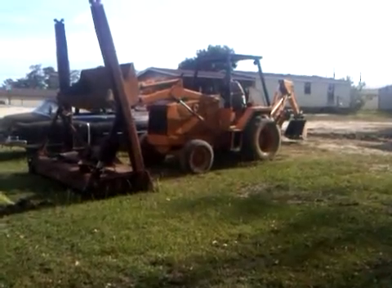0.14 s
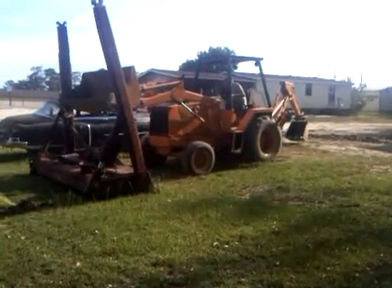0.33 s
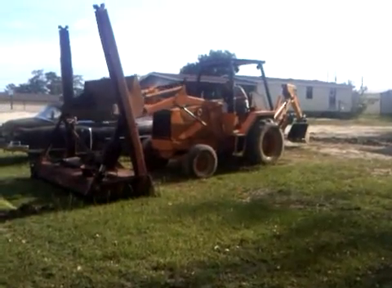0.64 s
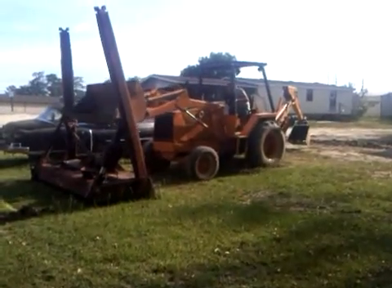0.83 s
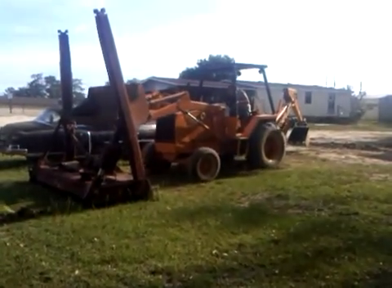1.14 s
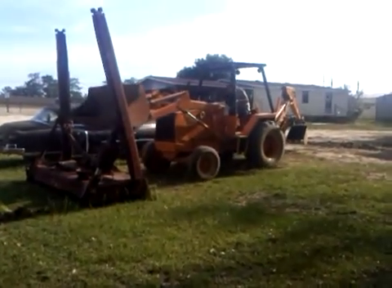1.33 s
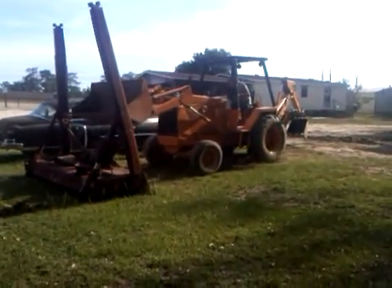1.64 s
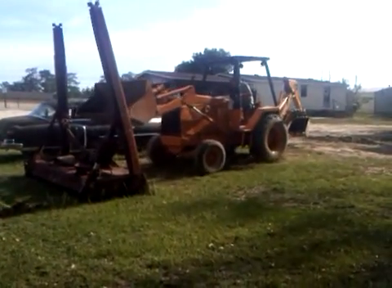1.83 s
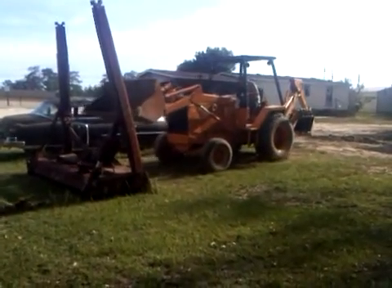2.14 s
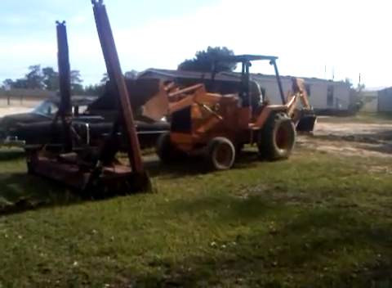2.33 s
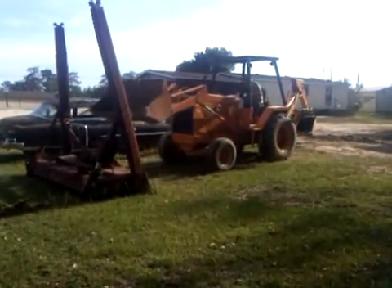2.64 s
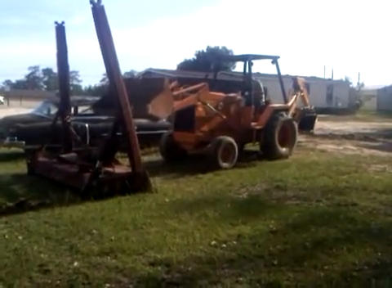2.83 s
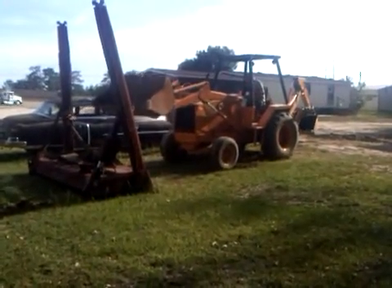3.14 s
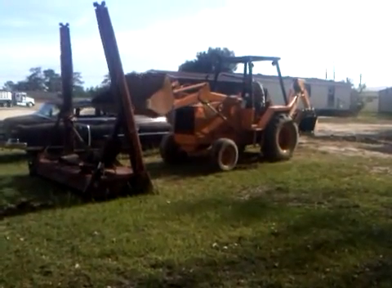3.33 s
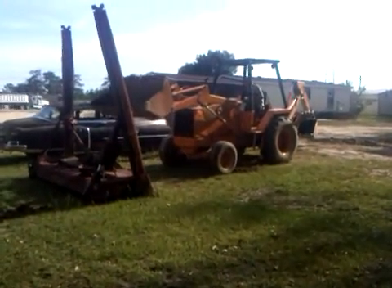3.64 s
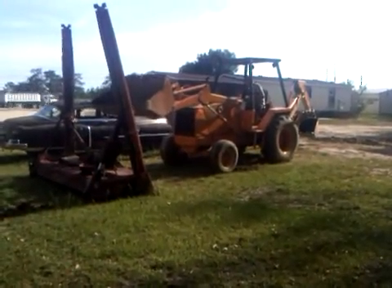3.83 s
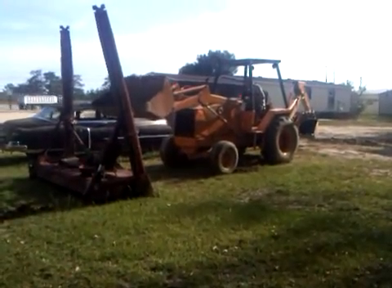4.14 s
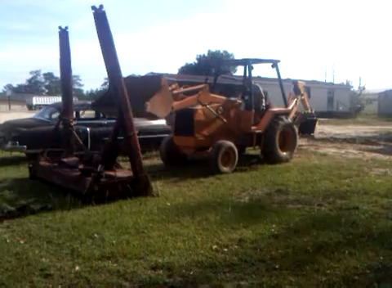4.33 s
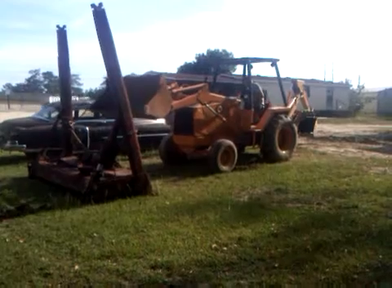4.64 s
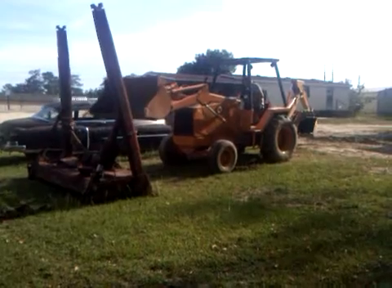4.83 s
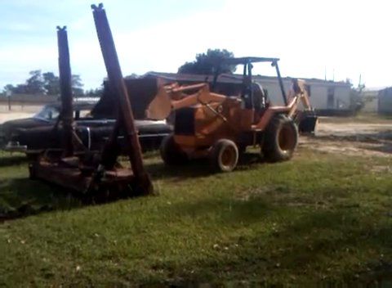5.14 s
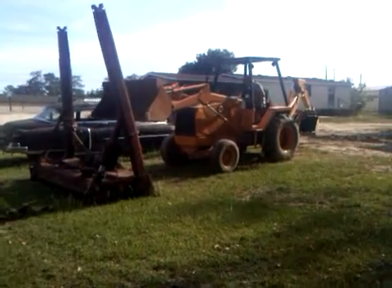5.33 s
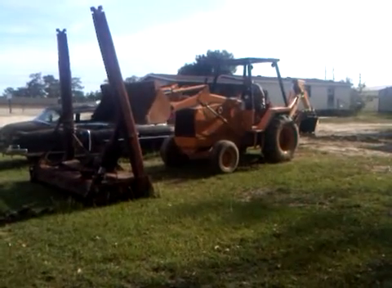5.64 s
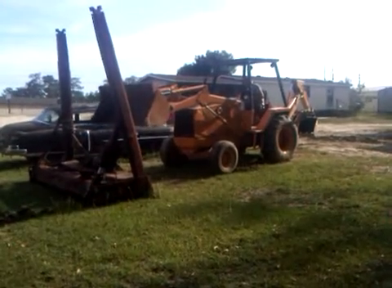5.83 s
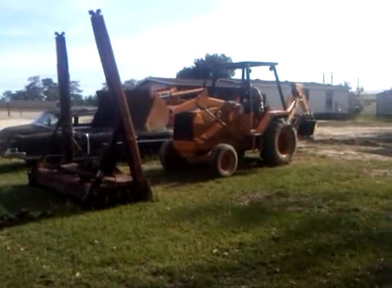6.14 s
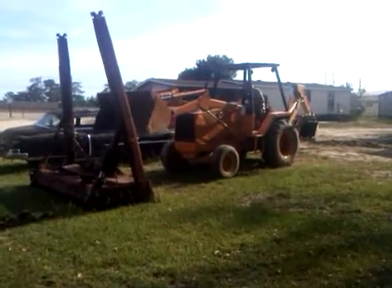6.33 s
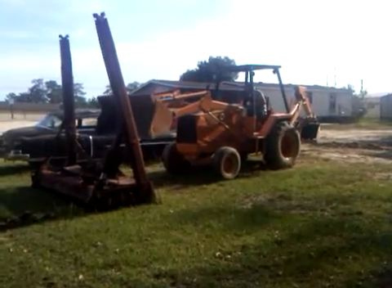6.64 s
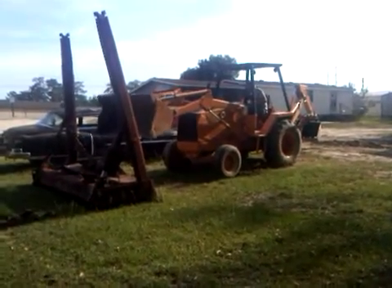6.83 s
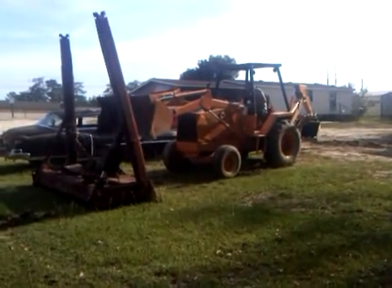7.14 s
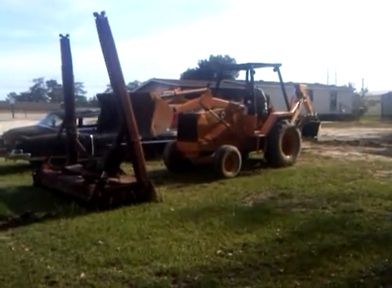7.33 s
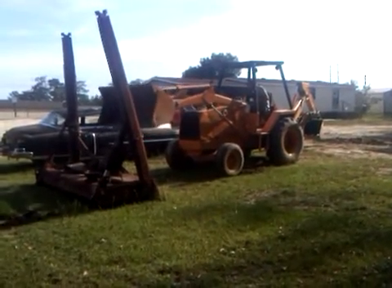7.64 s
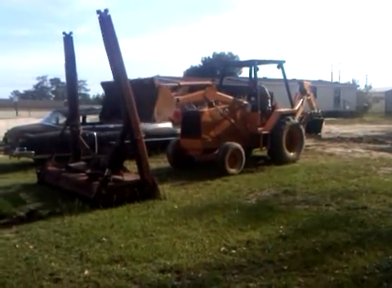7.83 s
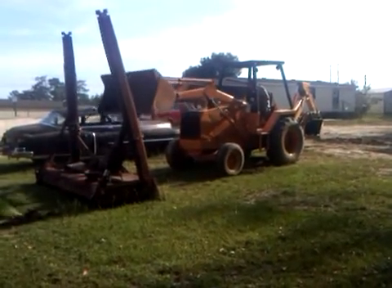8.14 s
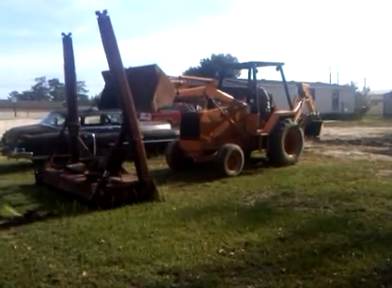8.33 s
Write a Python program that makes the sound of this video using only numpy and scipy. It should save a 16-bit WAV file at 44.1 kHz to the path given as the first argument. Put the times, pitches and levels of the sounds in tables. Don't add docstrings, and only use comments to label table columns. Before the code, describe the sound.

Outdoor diesel engine roars and clatters, drops abruptly to a surging, lumpy idle, with panel rattle, hydraulic groans, dry squeaks and late metal clanks.

```python
import sys
import numpy as np
from scipy import signal
from scipy.fft import rfft, irfft, next_fast_len
from scipy.io import wavfile
from scipy.ndimage import uniform_filter1d

SR = 44100
rng = np.random.default_rng(int(sys.argv[2]) if len(sys.argv) > 2 else 0)


def generate_wav(signal):
    frames = np.transpose(np.atleast_2d(signal))
    scaled = np.clip(frames, -1, 1) * 32767
    pcm = np.round(scaled).astype(np.int16)
    wavfile.write(sys.argv[1], SR, pcm)


def invert_db(x):
    u = np.asarray(x, float) / 20
    return 10 ** u


N = 373527
T = np.arange(N) / SR

# time in seconds, speed in firings per second.
REV = [
    (0.42, 30.4),
    (0.682, 36.6),
    (0.798, 39.6),
    (1.002, 42.1),
    (1.098, 43.0),
    (1.292, 42.6),
    (1.4, 41.4),
    (1.648, 39.6),
    (2.08, 39.7),
]
# time in seconds, shift in dB.
BOOM = [(0, 0.5), (2, -0.5), (3, -6), (4, -7.5), (5, 1.5), (6, 4.5), (7, 5.5), (8, 3), (8.47, 1.5)]
# frequency in Hz, density in dB per Hz.
CLATTER_REV = [(560, -29.5), (950, -8), (1140, -5.5), (1240, -3), (1430, -7.5), (1670, -0.5), (2160, -4.5),
               (2330, -2), (3060, -12), (3900, -18), (5070, -52.5), (8580, -120)]


def evened(x):
    return x / np.sqrt(np.mean(x ** 2) + 1e-20)


def curve(rows, index=1):
    rows = np.array(rows)
    return np.interp(T, rows[:, 0], rows[:, index])


def resonate(x, hz, width_hz):
    return signal.lfilter(*signal.iirpeak(hz, hz / width_hz, SR), x)


def resonate_twice(x, hz, width_hz, second_width_hz):
    return resonate(resonate(x, hz, width_hz), hz, second_width_hz)


def noise(colour_db, patchy_db, size=512):
    frames = 4 * N // size + 5
    a, b, patches = rng.standard_normal((frames, size // 2 + 1, 3)).T
    patches = uniform_filter1d(uniform_filter1d(patches, size=3, axis=0), size=8, axis=1)
    z = (a + 1j * b) * invert_db(patchy_db * evened(patches))
    x = signal.istft(z, nperseg=size, noverlap=3 * size // 4)[1][:N]
    length = next_fast_len(N)
    f, db = np.transpose(colour_db)
    log_hz = np.log(np.fft.rfftfreq(length, 1 / SR) + 1)
    colour = invert_db(np.interp(log_hz, np.log(f + 1), db, left=-120, right=-120))
    return evened(irfft(rfft(x, length) * colour, length)[:N])


def blow_shape(length_s, rise_s, fall_s):
    t = np.arange(int(length_s * SR)) / SR
    return t, (1 - np.exp(-t / rise_s)) * np.exp(-t / fall_s)


def bursts(rows, rise_s, fall_s):
    shape = blow_shape(.15, rise_s, fall_s)[1]
    kicks = np.zeros(N)
    for s, db, *_ in rows:
        kicks[int(s * SR)] = invert_db(db)
    return signal.oaconvolve(kicks, shape / shape.max())[:N]


def rings(rows, width_hz, rise_s, fall_s, strike=0):
    creep_s = .004 * bool(strike)
    out = np.zeros(N)
    t, shape = blow_shape(.12, rise_s, fall_s)
    for s, db, hz, *_ in rows:
        shake = rng.standard_normal(len(t)) * shape
        touch = strike * np.exp(-t / .003) * np.sin(2 * np.pi * hz * t)
        ring = resonate_twice(shake + touch, hz, width_hz, 2 * width_hz)
        part = out[int((s - creep_s) * SR):][:len(t)]
        part += (invert_db(db) * ring / abs(ring).max())[:len(part)]
    return out


def throttle():
    return np.interp(T, [REV[0][0], .7, 2.05, REV[-1][0] + .02], [0, 1, 1, 0])


def swells(times_s, peak_db, rise_s, fall_s, sag_db, square, rest_db):
    t = np.arange(0, N / SR + .01, .004)
    since = t[:, None] - times_s
    away = abs(since) / np.maximum(np.where(since < 0, rise_s, fall_s), .02)
    power = (invert_db(peak_db - sag_db * away ** square) ** 2).sum(1) + invert_db(rest_db) ** 2
    return np.interp(T, t, np.sqrt(power))


def follow(usual_db, thump, hiss, sag_db, square, lead_s, rest_db, roar_db, lingers_s=0):
    # time in seconds, thump in dB, hiss in dB, rise in seconds, fall in seconds.
    surges = [(0.006, -39, -45.8, 0.124, 0.2), (2.24, -52, -53, 0.16, 0.13),
              (2.517, -41, -44.5, 0.1, 0.097), (2.817, -40.5, -49.5, 0.083, 0.1),
              (3.172, -41, -49.5, 0.11, 0.082), (3.527, -39.8, -47.7, 0.14, 0.089),
              (3.823, -40, -46, 0.11, 0.083), (4.124, -46.5, -51.4, 0.23, 0.14),
              (4.423, -40, -51.5, 0.11, 0.15), (4.808, -43.5, -54, 0.15, 0.074),
              (5.066, -39.8, -49, 0.122, 0.055), (5.358, -43.5, -48, 0.073, 0.12),
              (5.532, -50, -44.7, 0.077, 0.038), (5.699, -43, -50.5, 0.163, 0.13),
              (5.953, -41.0, -53.5, 0.1, 0.127), (6.288, -39.5, -51, 0.11, 0.179),
              (6.598, -36.3, -50.4, 0.064, 0.069), (6.761, -39.5, -54, 0.064, 0.26),
              (7.087, -40.5, -51, 0.104, 0.149), (7.352, -43, -55, 0.16, 0.12),
              (7.637, -43.5, -49.5, 0.25, 0.083), (7.907, -38.9, -51.5, 0.096, 0.12),
              (8.165, -38.0, -49.5, 0.12, 0.17), (8.408, -42, -52, 0.12, 0.161)]
    # time in seconds, level in dB.
    effort = [(0.21, -54), (0.25, -43), (0.58, -43), (0.74, -37.4), (1.1, -35.8), (1.46, -38.8),
              (2.01, -38.5), (2.075, -46.5), (2.4, -54.5)]
    usual_thump_db, usual_hiss_db = -41, -50
    s, thump_db, hiss_db, rise_s, fall_s = np.transpose(surges)
    peak_db = usual_db + thump * (thump_db - usual_thump_db) + hiss * (hiss_db - usual_hiss_db)
    effort_db = np.interp(T - lingers_s * throttle(), *np.transpose(effort), left=-99, right=-99)
    surging = swells(s - lead_s, peak_db, rise_s, fall_s, sag_db, square, rest_db)
    return np.hypot(surging, invert_db(effort_db + roar_db))


def idle_exhaust(idle_speed):
    cylinders_db = [-4, -9.5, -3.5, -8]
    # frequency in Hz, width in Hz, level in dB.
    pipe_modes = [(55.1, 11.1, 4), (43.7, 12, -3), (85.3, 35.5, -1), (101.8, 20, -7), (117.2, 7.2, 1)]
    swell = (-42, 0.977, 0, 6.5, 1.35, -0.03, -51.5, 1.3)
    turns = np.cumsum(idle_speed) / SR
    at = np.flatnonzero(np.diff(np.floor(turns)))
    luck = rng.standard_normal((400, 2))[:len(at)]
    late = (.003 * SR * luck[:, 0]).astype(int)
    kicks = np.zeros(N)
    kicks[np.clip(at + late, 0, N - 1)] = invert_db(np.resize(cylinders_db, len(at)) + 3.5 * luck[:, 1])
    drive = evened(kicks) + 0.84 * rng.standard_normal(N)
    modes = [invert_db(db) * resonate_twice(drive, hz, width, 2.26 * width) for hz, width, db in pipe_modes]
    pipe = invert_db(curve(BOOM)) * modes[0] + invert_db(-curve(BOOM)) * modes[1] + sum(modes[2:])
    steady = np.sqrt(uniform_filter1d(pipe ** 2, size=6000))
    quiet_db = -15 * throttle()
    return invert_db(quiet_db) * np.minimum(follow(*swell), invert_db(-34)) * pipe / steady


def casting_knock(turns):
    # frequency in Hz, width in Hz, level in dB.
    casting = [(715, 50, -23), (810, 70, -16), (1595, 50, -16), (1715, 70, -17), (2045, 55, -15),
               (2137, 40, -18), (2290, 60, -14), (2394, 50, -16), (4150, 70, -24)]
    end = int(REV[-1][0] * SR) + 4000
    turns = turns[:end]
    luck = rng.standard_normal((400, len(casting)))[turns.astype(int)]
    burst = np.exp(-((turns + .1) % 1) / .3) * rng.standard_normal(end)
    out = np.zeros(N)
    for k, (hz, width, db) in enumerate(casting):
        struck = invert_db(4.0 * luck[:, k]) * burst
        out[:end] += invert_db(db) * evened(resonate_twice(struck, hz, width, 3 * width))
    return throttle() * out


def hood_hum():
    # frequency in Hz, width in Hz, level in dB.
    hood = [(700, 50, -13), (830, 80, -13)]
    # time in seconds, level in dB.
    strain = [(0, -6), (4, -4), (5.8, 1), (7.3, 2), (7.6, -8), (8.47, -8)]
    out = np.zeros(N)
    for hz, width, db in hood:
        hum = evened(resonate_twice(rng.standard_normal(N), hz, width, 3 * width))
        out += invert_db(db + curve(strain)) * hum
    return out


def block(turns):
    # frequency in Hz, density in dB per Hz.
    drone_idle = [(97, -37), (165, -2), (249, 3.5), (284, -8), (344, -8.5), (431, -10), (523, -7.5),
                  (601, -11), (686, -1), (1050, -7), (1360, -35), (2310, -120)]
    drone_rev = [(140, -33), (230, -3), (341, -11), (445, -9), (515, -5.5), (632, -10.5), (713, 0),
                 (1050, -4.5), (1360, -32), (2310, -120)]
    clatter_idle = [(560, -16.5), (950, -3.5), (1230, 4), (1390, -4.5), (1550, 0), (1970, -0.5), (2190, -3),
                    (3270, -6), (3900, -12.5), (5070, -50), (8580, -120)]
    hiss_colour = [(2380, -35.5), (4050, -2), (4250, -0.5), (5930, -6.5), (6750, -11.5), (7310, -21.5),
                   (7500, -62), (7600, -68.5), (9880, -90), (16700, -120)]
    drone_swell = (-45.7, 0.58, 0.22, 6.8, 1.55, 0.04, -52.5, -1.4)
    clatter_swell = (-46.5, 0.25, 0.53, 6, 1.07, 0.06, -57.5, 2)
    hiss_swell = (-51, 0.02, 1.02, 11.3, 2.5, 0.02, -65.2, -6.5)
    rev_share = throttle()
    idle, rev = np.sqrt(1 - rev_share), np.sqrt(rev_share)
    strength = invert_db((4.0 - 2.2 * rev_share) * rng.standard_normal(400)[turns.astype(int)])
    throb = evened(1 + 0.38 * strength * np.sin(np.pi * turns) ** 2)

    drone = idle * noise(drone_idle, 2.1, size=2048) + rev * noise(drone_rev, 2.15, size=2048)
    drone += idle * hood_hum()
    drone *= invert_db(.02 * curve(BOOM))

    clatter = idle * noise(clatter_idle, 3.1) + rev * invert_db(-1.5) * noise(CLATTER_REV, 2.75, size=1024)
    clatter += casting_knock(turns)
    db_per_speed, db_per_gain = .25, .11
    speed = curve(REV)
    gaining = uniform_filter1d(np.maximum(np.gradient(speed) * SR, 0), size=6000)
    clatter *= invert_db(rev_share * (db_per_speed * (speed - REV[-1][1]) + db_per_gain * gaining))

    hiss = follow(*hiss_swell) * noise(hiss_colour, 2.4)
    drone *= follow(*drone_swell, lingers_s=.045)
    return throb * (drone + follow(*clatter_swell) * clatter + hiss)


def slams():
    # start in seconds, peak in dB.
    strokes = [(0.0218, -42), (0.0644, -47), (0.254, -37), (0.29, -33.5), (0.325, -31.5), (0.359, -34.5),
               (0.459, -33.5), (0.5544, -33.5), (0.696, -27.5), (2.5094, -38), (3.354, -35.5), (3.522, -36),
               (3.724, -39), (4.297, -38), (5.325, -35.5), (5.67, -38), (8.14, -34), (8.172, -33),
               (8.3983, -34)]
    # frequency in Hz, density in dB per Hz.
    scrape_colour = [(290, -47), (500, -13), (1360, -5.5), (1500, -6.5), (1620, -1), (3470, -7),
                     (3780, -2.5), (5000, -22), (6500, -45), (11000, -120)]
    return invert_db(-5.0) * bursts(strokes, .004, .014) * noise(scrape_colour, 3.6)


def pings():
    # start in seconds, peak in dB, frequency in Hz.
    blows = [(0.0223, -39, 2370), (0.0588, -38, 1960), (0.3077, -36, 2290), (0.3586, -34, 2470),
             (0.4304, -37, 2060), (0.4993, -36, 2290), (0.6095, -34, 2220), (0.6973, -27, 2300),
             (0.7711, -29, 2290), (0.8225, -27, 2280), (0.8729, -27, 2050), (0.9722, -27, 2290),
             (1.1069, -31, 2400), (1.1807, -28, 2300), (1.255, -29, 2000), (1.3428, -32, 2000),
             (1.4666, -34, 1970), (1.5414, -30, 2310), (1.5693, -34, 2110), (1.6432, -29, 2000),
             (1.7389, -32, 2290), (1.8442, -30, 2260), (1.8961, -33, 2140), (1.9754, -32, 2030),
             (2.1041, -41, 1990), (2.3416, -44, 2120), (2.4404, -39, 2320), (2.7442, -40, 2230),
             (3.3563, -34, 2280), (3.5309, -36, 2240), (3.7274, -44, 2560), (4.3999, -38, 2520),
             (5.3293, -38, 1960), (5.4919, -37, 2310), (5.6376, -41, 1900), (5.8536, -42, 2220),
             (5.9374, -43, 2150), (6.2158, -42, 2200), (6.5655, -38, 2330), (7.0878, -40, 2320),
             (7.8211, -39, 2210), (8.1359, -37, 2010), (8.1728, -34, 1900), (8.4023, -36, 2240)]
    return invert_db(-4.0) * rings(blows, 190, .002, .013, strike=.3)


def loose_panel():
    # start in seconds, peak in dB, frequency in Hz.
    rev_blows = [(0.0283, -33, 1660), (0.0682, -29, 1550), (0.2563, -36, 1500), (0.2972, -35, 1450),
                 (0.3311, -28, 1510), (0.3591, -33, 1720), (0.5247, -38, 1560), (0.5556, -32, 1730),
                 (0.6145, -38, 1780), (0.856, -33, 1800), (0.8874, -29, 1640), (0.9996, -28, 1730),
                 (1.0605, -30, 1710), (1.1807, -32, 1730), (1.2336, -30, 1610), (1.2575, -32, 1630),
                 (1.3249, -31, 1640), (1.3803, -32, 1560), (1.4057, -30, 1780), (1.5883, -33, 1710),
                 (1.6492, -30, 1670), (1.7205, -31, 1700), (1.7514, -32, 1580), (1.8008, -34, 1530),
                 (1.8477, -29, 1600), (1.925, -32, 1710)]
    idle_blows = [(2.1871, -51, 1620), (2.4874, -44, 1580), (2.7424, -39, 1600), (3.0517, -51, 1490),
                  (3.105, -42, 1570), (3.1884, -45, 1540), (3.4767, -39, 1500), (3.5291, -38, 1530),
                  (3.577, -36, 1570), (3.7251, -43, 1550), (3.7795, -39, 1550), (3.8139, -41, 1540),
                  (3.8568, -40, 1570), (4.0424, -42, 1600), (4.0863, -39, 1550), (4.1322, -33, 1530),
                  (4.3552, -46, 1590), (4.3986, -48, 1540), (4.4485, -39, 1590), (4.4899, -42, 1550),
                  (4.7129, -41, 1590), (4.7518, -41, 1570), (4.9454, -42, 1600), (4.9918, -40, 1540),
                  (5.0396, -44, 1560), (5.2706, -48, 1610), (5.3185, -34, 1580), (5.4956, -39, 1600),
                  (5.5395, -41, 1550), (5.6368, -37, 1560), (5.8618, -38, 1600), (5.8922, -39, 1550),
                  (5.986, -39, 1590), (6.0344, -45, 1600), (6.2125, -36, 1570), (6.2604, -41, 1600),
                  (6.5278, -46, 1550), (6.5622, -38, 1610), (6.7468, -40, 1530), (6.8321, -41, 1530),
                  (6.87, -37, 1600), (7.0052, -48, 1590), (7.0451, -47, 1590), (7.0865, -38, 1530),
                  (7.542, -44, 1610), (7.6283, -41, 1590), (7.6772, -36, 1540), (7.8183, -31, 1560),
                  (7.8577, -36, 1590), (7.9036, -37, 1590), (7.9421, -36, 1580), (8.0718, -39, 1680),
                  (8.1067, -38, 1520), (8.1451, -31, 1590), (8.1825, -30, 1610), (8.2933, -40, 1570),
                  (8.3297, -33, 1600), (8.3751, -38, 1610)]
    rev = invert_db(-4.5) * rings(rev_blows, 125, .002, .016, strike=.3)
    idle = invert_db(0.7) * rings(idle_blows, 125, .0015, .02, strike=.3)
    scrape = invert_db(-10.5) * bursts(idle_blows, 0.004, 0.013) * noise(CLATTER_REV, 3.4)
    return rev + idle + scrape


def pops():
    # start in seconds, peak in dB, frequency in Hz.
    firings = [(0.246, -30, 70), (2.495, -30, 59.2), (2.962, -29, 116), (3.802, -32, 53.8),
               (5.061, -30, 115), (5.35, -30, 55), (5.662, -32, 51.1), (5.969, -35, 53.8),
               (6.578, -32, 54.4), (6.779, -26, 56.5), (7.048, -28, 45.8), (7.089, -35, 53.8),
               (7.348, -28, 59.2), (7.885, -27, 57)]
    out = np.zeros(N)
    t = np.arange(-1500, 1500) / SR
    for s, db, hz in firings:
        push = np.cos(2 * np.pi * hz * t) * np.exp(-(t * hz / 0.68) ** 2)
        out[int(s * SR) - 800:][:len(t)] += invert_db(db - 3.5) * push
    return out


def rev_exhaust(turns):
    # multiple of firing rate, level in dB; odd multiples are pump and fan.
    orders = [(1, 3), (2, 2), (3, -2), (4, -24), (4.17, -12), (5, -16.5), (6, -33), (7.6, -32), (8.33, -15)]
    # multiple of firing rate, level in dB.
    half_orders = [(1.5, -25), (2.5, -20), (3.5, -24), (4.5, -27)]
    # frequency in Hz, width in Hz, lift in dB.
    stack = [(105.4, 6.4, 9.5), (119, 5, 2), (184, 11, 10), (216, 11, 17)]
    # time in seconds, level in dB.
    level = [(0.42, -42), (0.558, -37.5), (0.604, -37.5), (1.574, -38), (1.932, -37.5), (2.032, -39),
             (2.08, -45)]
    pipe_lag_rad = .8
    end = int(REV[-1][0] * SR)
    out, speed = np.zeros(N), curve(REV)[:end]
    for multiple, db in orders + half_orders:
        waver = evened(uniform_filter1d(rng.standard_normal(N), size=2200))[:end]
        lift_db = sum(top_db / (1 + ((multiple * speed - hz) / width) ** 2) for hz, width, top_db in stack)
        tone = np.cos(multiple * (2 * np.pi * turns[:end]) - pipe_lag_rad)
        out[:end] += invert_db(db + lift_db + 1.9 * waver) * tone
    gate = np.interp(T, [.42, .5, 2.035, 2.045, 2.08], [0, 1, 1, .4, 0])
    return invert_db(curve(level) - 1.0) * gate * out


def pump():
    # time in seconds, hum in dB, groan in dB, half length in seconds.
    levers = [
        (0.637, -43.5, -46, .2),
        (1.25, -42.5, -45.5, .4),
        (2.1, -50, -62, .15),
        (3.49, -49, -56, .3),
        (4.41, -53.5, -44.5, .22),
        (5.017, -52.5, -46.5, .18),
    ]
    # time in seconds, level in dB, half length in seconds, frequency in Hz, width in Hz.
    wind_down = (2.03, -43, .07, 1010, 160)
    rest_db, sag_db = -60, 12
    flow = rng.standard_normal((2, N))
    hum = evened(resonate_twice(flow[0], 350, 45, 80))
    groan = evened(resonate(resonate(flow[1], 507, 120), 470, 190))
    s, hum_db, groan_db, half_s = np.transpose(levers)
    hum *= swells(s, hum_db, half_s, half_s, sag_db, 1, rest_db)
    groan *= swells(s, groan_db, half_s, half_s, sag_db, 1, rest_db)
    s, db, half_s, hz, width = wind_down
    whine = evened(resonate_twice(flow[0], hz, width, 2 * width))
    whine *= invert_db(db - sag_db * ((T - s) / half_s) ** 2)
    return whine + invert_db(-1.5) * hum + invert_db(-5.5) * groan


def pin_squeaks():
    # start in seconds, peak in dB, frequency in Hz.
    squeaks = [
        (2.9178, -50, 3480),
        (3.3558, -55, 3230),
        (3.8916, -39, 3180),
        (4.1944, -36, 3050),
        (4.5715, -46, 3300),
        (4.8294, -42.5, 3188),
        (5.7872, -42.5, 3163),
        (6.566, -45, 3270),
        (7.2045, -43.5, 3460),
        (8.3983, -37.5, 3637),
    ]
    return rings(squeaks, 300, 0.0014, 0.036)


def bucket_knocks():
    # start in seconds, peak in dB, body frequency in Hz, edge in dB relative to body.
    knocks = [
        (3.3478, -40, 950, -9),
        (3.5217, -35, 1140, -19),
        (5.3194, -44, 1140, -6),
        (5.3522, -49, 993, 13),
        (8.1, -36, 1110, -16),
        (8.1456, -25.5, 1123, -12),
        (8.1733, -35, 1260, -3),
        (8.325, -31, 1130, -14),
    ]
    edge_rows = [(s, db + edge_db, 3840) for s, db, hz, edge_db in knocks]
    return rings(knocks, 130, 0.003, 0.005) + rings(edge_rows, 140, 0.0036, 0.0075)


def thuds():
    # start in seconds, peak in dB, frequency in Hz.
    drops = [
        (3.365, -30, 254),
        (3.487, -33, 190),
        (3.529, -31, 300),
        (3.615, -34, 203),
        (4.31, -37, 420),
    ]
    return invert_db(1.5) * rings(drops, 200, 0.0036, 0.011)


def scene():
    # time in seconds, speed in firings per second.
    idle_rows = [(0, 29.3), (.45, 29.6), (2.1, 29), (2.5, 22.1), (3.5, 19.4), (4.5, 25.4), (6, 22),
                 (7, 20.65), (8.47, 22.5)]
    idle_speed = curve(idle_rows)
    speed = np.where((T > REV[0][0]) & (T < REV[-1][0]), curve(REV), idle_speed)
    turns = .3 + np.cumsum(speed) / SR
    engine = idle_exhaust(idle_speed) + block(turns) + pops() + rev_exhaust(turns)
    ironwork = slams() + pings() + loose_panel() + pin_squeaks() + bucket_knocks() + thuds()
    return (engine + pump() + ironwork)[None]


def thin_treble(x):
    # time in seconds, length in seconds.
    starved = [(2.62, 0.026), (3.292, 0.026), (3.316, 0.026), (4.876, 0.026), (5.204, 0.026), (3.67, 0.016),
               (7.803, 0.014), (8.045, 0.024), (8.276, 0.012), (6.488, 0.05), (6.676, 0.042)]
    hz, t, z = signal.stft(x, SR, nperseg=352, noverlap=176)
    power = uniform_filter1d(uniform_filter1d(abs(z) ** 2, size=3, axis=0), size=3, axis=1)[1::3, 1::3]
    band_hz, block_s = hz[1::3], t[1::3]
    limit_db = np.interp(band_hz, [2300, 3300, 5000, 6500, 7300, 7700], [-97, -85, -83.5, -85, -88, -130])
    busy = np.interp(block_s, [.78, .8, 1.62, 1.64, 1.87, 1.89, 2.02, 2.04], [1, 0, 0, 1, 1, 0, 0, 1])
    middle_db = 10 * np.log10(power[2:8].mean(0) + 1e-20)
    masking_db = .65 * busy * np.maximum(middle_db + 70, 0)
    over_db = 10 * np.log10(power + 1e-20) - limit_db[:, None] - masking_db
    budget_db = 5.5 * rng.standard_normal(power.shape) + 2.2 * rng.standard_normal(power.shape[1])
    for s, length_s in starved:
        budget_db[band_hz > 4900] -= 30 * (abs(block_s - s) < length_s / 2)
    keep = (over_db + budget_db > .8) * invert_db(np.clip(6.5 - over_db, 0, 11))
    keep = np.repeat(np.repeat(keep, 3, 0), 3, 1)
    keep = np.pad(keep, ((0, 3), (0, 3)), "edge")[:len(hz), :len(t)]
    thin = signal.istft(z * keep, SR, nperseg=352, noverlap=176)[1][:N]
    thin -= .85 * resonate(thin, 3985, 70)
    lowpass = signal.firwin(255, 7450, window=("kaiser", 9), fs=SR)
    return signal.oaconvolve(thin, lowpass, "same")


def edge_ticks():
    # time in seconds, peak in dB.
    ticks = [(0.3396, -70), (0.6599, -71), (0.7876, -67), (1.6432, -94), (1.6836, -68), (1.8756, -62),
             (2.1316, -76), (2.1959, -76), (2.2598, -79), (2.3236, -75), (2.4518, -71), (2.5157, -68),
             (2.8355, -73), (3.1557, -73), (3.4116, -72), (3.476, -74), (3.5399, -73), (3.8596, -70),
             (3.9235, -76), (3.9878, -76), (4.1155, -74), (4.372, -79), (4.4358, -74), (4.7556, -76),
             (4.8199, -79), (4.8838, -79), (5.4595, -73), (5.5238, -63), (6.0357, -80), (6.2277, -76),
             (6.356, -77), (6.5475, -78), (6.6119, -74), (7.1876, -77), (7.5717, -76), (7.6355, -71),
             (7.892, -73), (8.2117, -71), (8.4038, -74)]
    s, db = np.transpose(ticks)
    marks = np.zeros(N)
    marks[((s - .003) * SR).astype(int)] = invert_db(db + 4.5)
    return signal.oaconvolve(marks, np.hanning(480))[:N] * np.sin(2 * np.pi * 8000 * T)


def low_pass(x):
    return signal.sosfilt(signal.butter(12, 9050, fs=SR, output="sos"), x)


def record(dry):
    mix = thin_treble(dry[0]) + edge_ticks() + .0011
    return low_pass(mix[None])


dry = scene()
out = record(dry)
generate_wav(out)
```